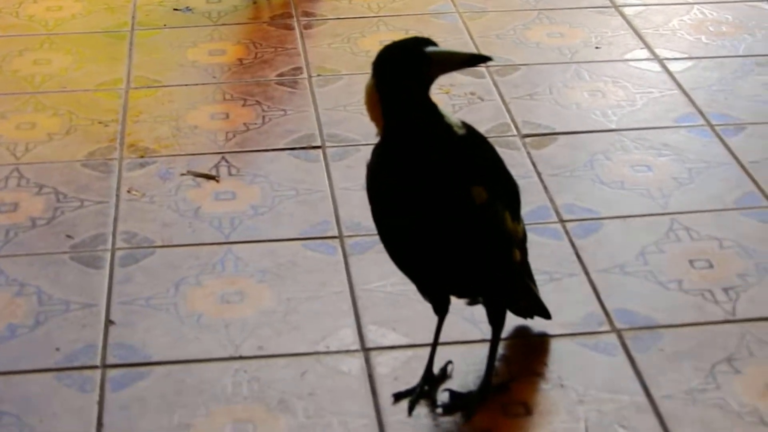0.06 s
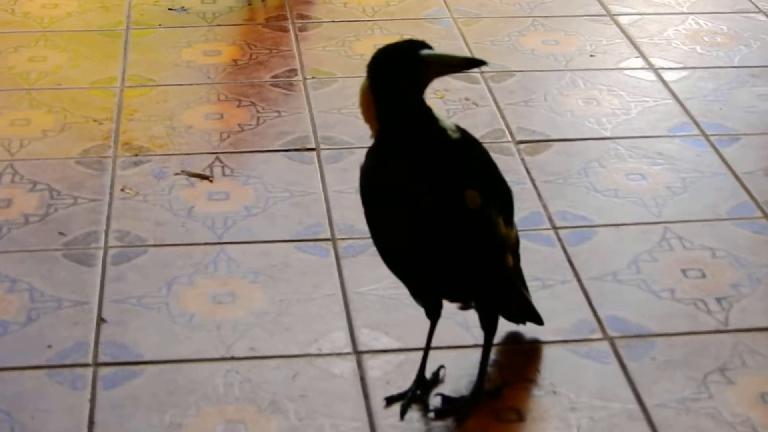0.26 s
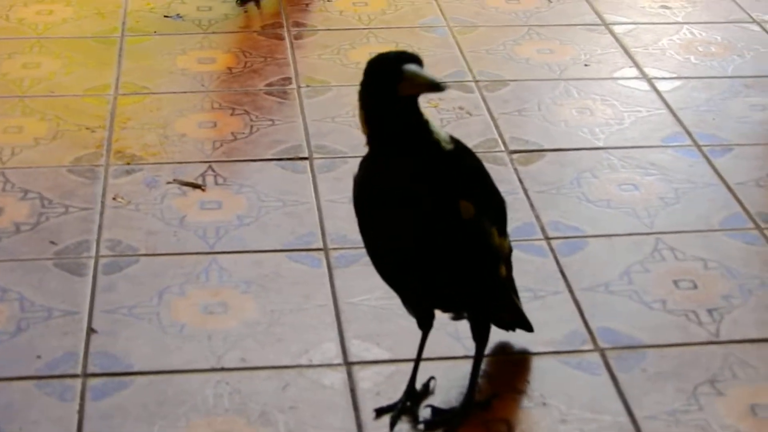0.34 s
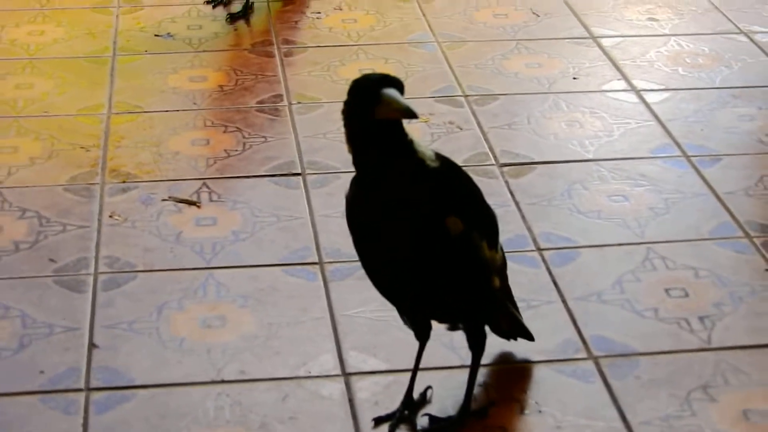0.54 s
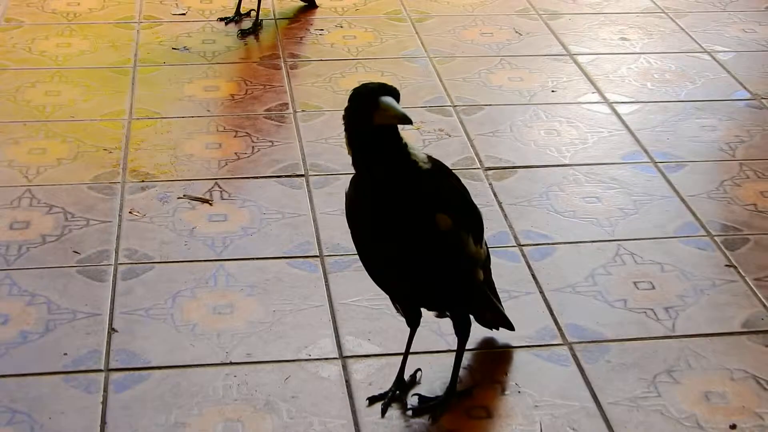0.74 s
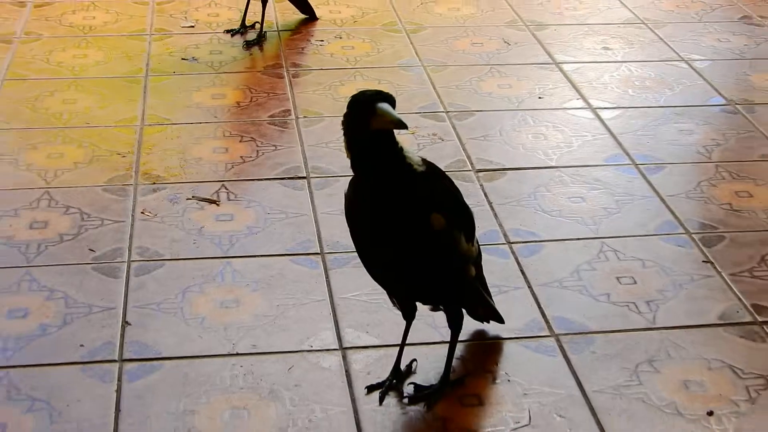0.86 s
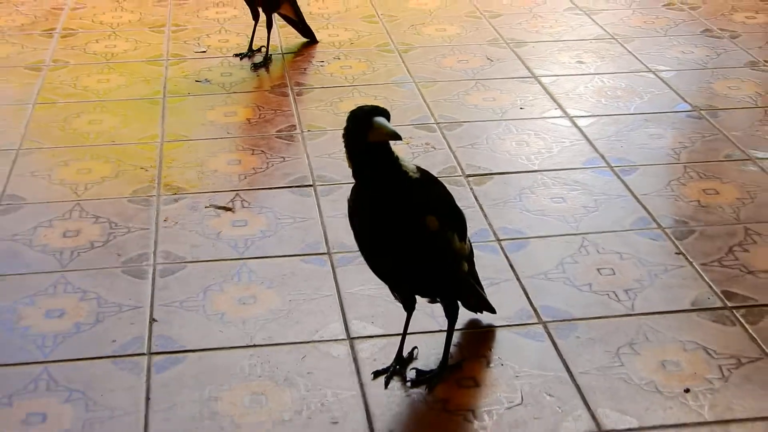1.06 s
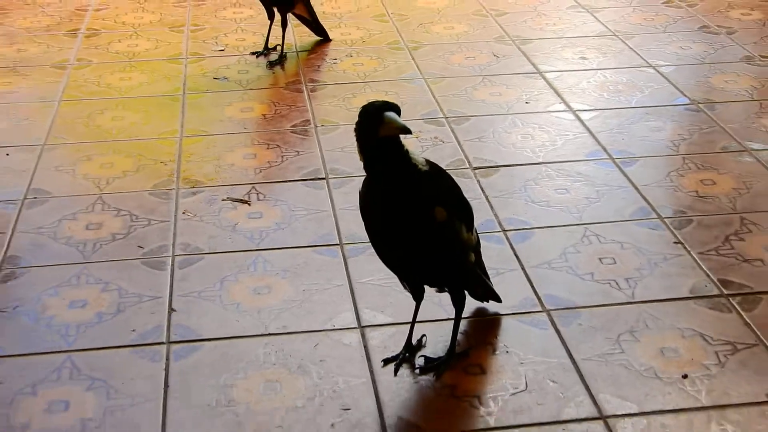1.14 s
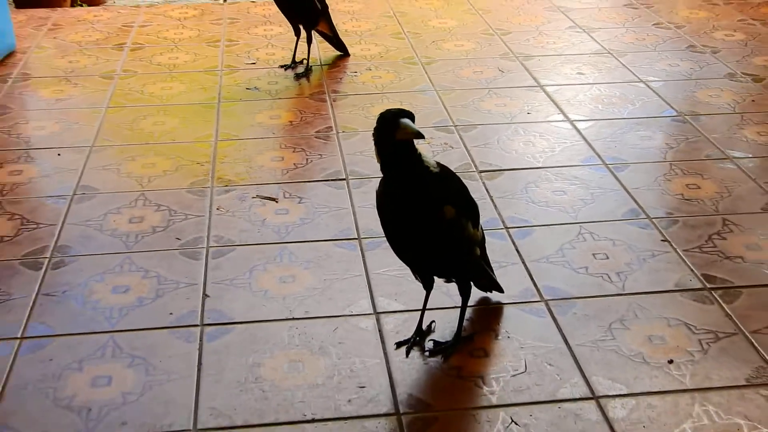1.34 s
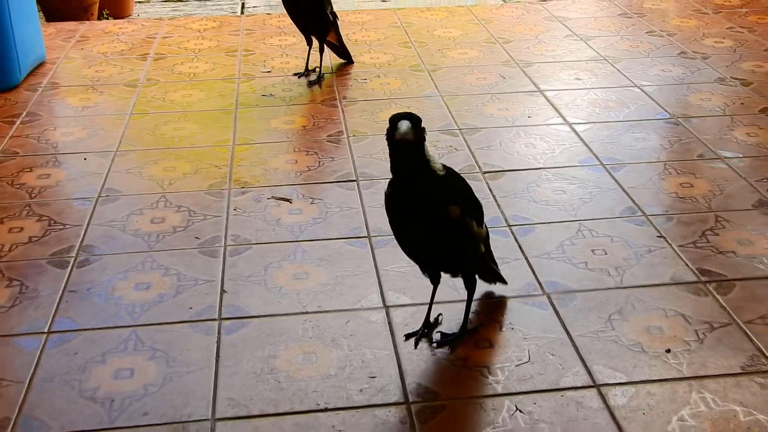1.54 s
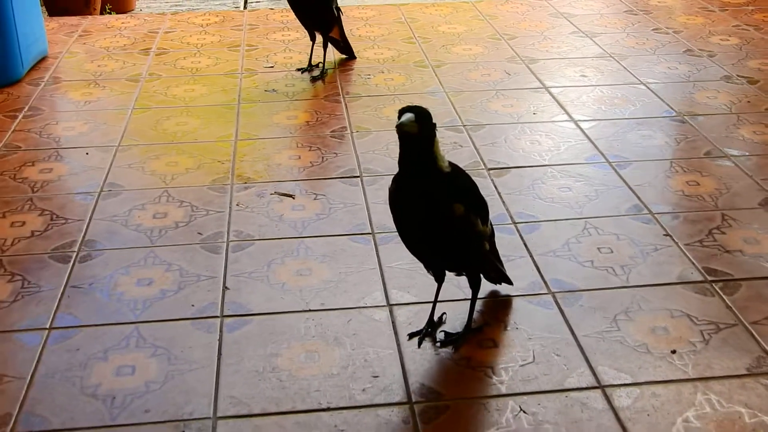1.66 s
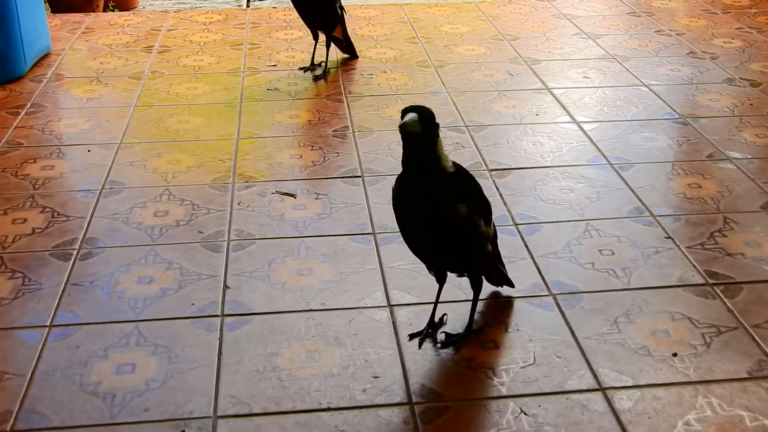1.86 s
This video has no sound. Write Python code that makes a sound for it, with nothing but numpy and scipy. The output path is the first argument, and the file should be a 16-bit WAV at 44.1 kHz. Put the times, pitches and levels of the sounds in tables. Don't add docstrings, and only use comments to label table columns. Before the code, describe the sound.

Single hoarse magpie squawk, close by, over faint distant chirps, handling clicks and soft outdoor rumble

```python
import sys
import numpy as np
from scipy import signal
from scipy.fft import rfft, irfft
from scipy.io import wavfile
from scipy.ndimage import uniform_filter1d, minimum_filter1d

SR = 44100
rng = np.random.default_rng(int(sys.argv[2]) if len(sys.argv) > 2 else 0)


def ratio_of_db(decibels):
    return 10 ** (np.asarray(decibels, float) / 20)


def master_out(mix):
    frames = np.transpose(np.atleast_2d(mix))
    ceiling = np.clip(frames, -1, 1)
    pcm = np.round(ceiling * 32767).astype(np.int16)
    wavfile.write(sys.argv[1], SR, pcm)


N = 83790
T = np.arange(N) / SR


def rms_one(x):
    return x / np.sqrt(np.mean(x ** 2) + 1e-20)


def at_hz(points, hz):
    table_hz, values = np.transpose(points)
    return np.interp(np.log(hz), np.log(table_hz), values)


def bin_hz():
    return np.maximum(np.fft.rfftfreq(N, 1 / SR), 1)


def drift(rate_hz):
    r = np.exp(-2 * np.pi * rate_hz / SR)
    noise = rng.standard_normal(N + 8000)
    return rms_one(signal.lfilter([1], [1, -2 * r, r * r], noise)[8000:])


def ring(clicks, hz, t60_s):
    r, w = ratio_of_db(-60 / (t60_s * SR)), 2 * np.pi * hz / SR
    return signal.lfilter([0, np.sin(w)], [1, -2 * r * np.cos(w), r * r], clicks + 1e-18)


def resonance(x, hz, width_hz):
    r = np.exp(-np.pi * width_hz / SR)
    poles = [1, -2 * r * np.cos(2 * np.pi * hz / SR), r * r]
    return signal.lfilter([(1 - r * r) / 2, 0, (r * r - 1) / 2], poles, x)


def butter(x, order, hz, kind="low"):
    return signal.sosfilt(signal.butter(order, hz, kind, fs=SR, output="sos"), x)


def pan(left_over_right_db):
    return ratio_of_db(np.array([[.5], [-.5]]) * left_over_right_db)


def throat(source, pitch_hz):
    # centre in Hz, width in Hz, level in dB.
    resonances = [(750, 360, -16.5), (1530, 200, 0.5), (1990, 354, 4), (2540, 110, -23), (3524, 298, -5),
                  (4650, 150, -7.5), (5150, 840, -14.5), (5913, 300, -7.5), (6350, 41, -8),
                  (7880, 830, -20), (9760, 740, -10.5), (10200, 1530, -17.5), (12090, 740, -9)]
    closed_hz = 850
    closing = np.clip((pitch_hz.max() - 10 - pitch_hz) / (pitch_hz.max() - closed_hz), 0, 1)
    beak_open, beak_closed = source * (1 - closing), source * closing
    out = ratio_of_db(-10.5) * resonance(beak_closed, closed_hz, 210)
    for k, (hz, width_hz, db) in enumerate(resonances):
        sagged_hz = hz * 0.886 if k in (1, 2) else hz
        both = resonance(beak_open, hz, width_hz) + resonance(beak_closed, sagged_hz, width_hz)
        out += (-1) ** k * ratio_of_db(db) * both
    for hz, width_hz, share in [(3140, 320, 1), (4020, 420, .75)]:
        out = out - share * resonance(out, hz, width_hz)
    faint_top_band = butter(out, 4, [12800, 14500], "band")
    beak_top = signal.cheby2(8, 40, 12100 * 1.03, fs=SR, output="sos")
    return ratio_of_db(-24) * faint_top_band + signal.sosfilt(beak_top, out)


def squawk():
    # time in seconds, pitch in Hz, flutter in Hz, flutter depth in radians, level in dB,
    # brightness in dB per octave, hoarseness 0-1.
    course = [
        (0.185, 882.9, 168.6, 0.63, -63, -19, 0.1),
        (0.198, 905.5, 169.9, 0.65, -30, -43, 0),
        (0.216, 924.3, 167.5, 0.76, -24, -38, 0.06),
        (0.242, 930.2, 166.8, 0.55, -21.5, 0.5, 0.11),
        (0.294, 917.3, 158.7, 0.64, -11.5, 3, 0),
        (.315, 892, 159.2, 0.51, -15.5, 6, 0.21),
        (.332, 858.7, 169.8, 0.19, -19, 5.2, 0.2),
        (.349, 847.2, 172.3, 0.67, -19, 0.5, 0.27),
        (.383, 750, 173, 0.66, -42, 12.5, 0.3),
    ]
    s, *columns = np.transpose(course)
    pitch_hz, flutter_hz, depth_rad, level_db, tilt_db, hoarse = [np.interp(T, s, c) for c in columns]
    jitter_rad = 3.37 * hoarse
    shake = 2 * np.pi * np.cumsum(flutter_hz) / SR + jitter_rad * drift(51)
    phase = 2 * np.pi * np.cumsum(pitch_hz) / SR + depth_rad * np.sin(shake)
    phase = phase + 0.42 * jitter_rad * drift(112)

    voice = np.zeros(N)
    for k in range(1, 14):
        harmonic_db = tilt_db * np.log2(max(k / 4, 1))
        if k == 3:
            harmonic_db = harmonic_db + tilt_db - 5
        voice += ratio_of_db(harmonic_db) * np.cos(k * phase + k * k)
    croak = np.exp(-2 * ((T - s[1] - .008) / 0.033) ** 2)
    voice += ratio_of_db(1) * croak * np.cos(phase - shake / 2 + 1.3 * drift(40))

    white = rng.standard_normal(N)
    white = white - .75 * butter(white, 1, 2600)
    breath = white + ratio_of_db(0.55 * tilt_db) * np.diff(white, prepend=0)
    breath = breath * (1 + 1.3 * np.cos(phase))
    source = voice + 8.5 * ratio_of_db(-7) * np.sqrt(hoarse) * breath

    shimmer_db = 2 * hoarse * drift(130)
    source = source * ratio_of_db(shimmer_db + level_db + 4) * (T > s[0]) * (T < s[-1])
    throb = 1 + 0.24 * np.cos(shake + 1.42)
    catch_db = 4.5 * np.exp(-((T - .348) / 0.0039) ** 2)
    return throat(source * throb * ratio_of_db(catch_db), pitch_hz)


def chirps():
    # start in seconds, length in seconds, level in dB, first Hz, last Hz.
    calls = [(-.03, 0.11, -41.5, 6040, 6350), (0.07, 0.1, -39.5, 6350, 6340),
             (0.094, 0.085, -54.5, 4980, 4870), (0.452, 0.024, -40, 5720, 5690),
             (0.484, 0.051, -49, 5690, 5700), (0.441, 0.035, -45.5, 3830, 3800),
             (0.483, 0.048, -47, 3790, 3800), (0.507, 0.023, -42.5, 5150, 5150),
             (0.538, 0.022, -36, 6000, 6280), (0.575, 0.018, -37, 6120, 6250),
             (0.588, 0.028, -51, 6230, 6200), (0.583, 0.022, -39, 4600, 4630),
             (0.6, 0.014, -37.5, 5150, 5150), (1.27, 0.067, -49.5, 5000, 4950)]
    out = np.zeros(N)
    blur_rad = 0.99 * drift(60)
    wobble_db = 3 * drift(60)
    for s, length_s, db, first_hz, last_hz in calls:
        u = np.clip((T - s) / length_s, 0, 1)
        swell = np.sqrt(np.sin(np.pi * u).clip(0))
        glide = 2 * np.pi * np.cumsum(first_hz + (last_hz - first_hz) * u) / SR
        out += ratio_of_db(db + 0.5) * swell * np.sin(glide + blur_rad * (length_s / 0.041) ** 0.91)
    return out * ratio_of_db(wobble_db)


def knocks():
    # time in seconds, level in dB, colour in Hz, hum level in dB, left over right in dB.
    hits = [(.002, -37, 1120, -23.5, -2), (0.068, -38, 1480, -26.5, -2), (0.128, -44, 1113, -43, -2),
            (0.244, -13.5, 970, -14, -4.5), (0.314, -13.5, 1170, -13.5, -2.5),
            (0.368, -19.5, 1210, -21, -3), (0.597, -29, 1210, -50, 1.5), (0.6196, -23.5, 1730, -29.5, -4.5),
            (0.639, -40, 696, -38, -8), (1.252, -46.5, 1400, -54, 16), (1.264, -22.5, 1275, -23.5, -5.5),
            (1.274, -39.5, 523, -35, -13), (1.567, -37.5, 1020, -36, -2), (1.578, -43, 1680, -38, 0),
            (1.662, -37.5, 380, -54.5, -16.5), (1.71, -45, 1160, -40, -8), (1.722, -40, 825, -41.5, 5),
            (1.777, -38, 1140, -40, 2.5)]
    # mode in Hz, level in dB, t60 in seconds.
    modes = [(363, -4.5, 0.047), (750, -10.5, 0.032), (1095, -7.5, 0.021), (1250, -7, 0.013),
             (1400, -29, 0.12), (1905, -5, 0.0065), (2460, -2.5, 0.0045)]
    size = SR // 2
    t = T[:size]
    out = np.zeros((2, N))
    soft = 0.06 * rms_one(np.exp(-t / 0.00062) * t) / np.sqrt(size)
    hollow = ring(soft, 264.7, 0.27) + ratio_of_db(4.5) * ring(soft, 356, 0.031)
    hollow = np.array([hollow, np.interp(t - 0.00027, t, hollow)])
    for s, db, colour_hz, hum_db, pan_db in hits:
        grit = 0.072 * rng.standard_normal(size) * np.exp(-t / 0.0058) * (t < .03)
        contact = grit + (t == 0)
        for _ in range(2):
            contact = resonance(contact, colour_hz, colour_hz)
        hit = ratio_of_db(hum_db) * hollow
        for hz, mode_db, t60_s in modes:
            off_colour_db = 2.2 * np.log2(hz / colour_hz) ** 2
            hit = hit + ratio_of_db(db + mode_db + 9 - off_colour_db) * ring(contact, hz, t60_s)
        i = int(s * SR)
        out[:, i:i + size] += (pan(pan_db) * hit)[:, :N - i]
    return butter(out, 2, 120, "high")


def pings(rows, soft_cycles):
    out = np.zeros(N)
    for s, db, hz, t60_s in rows:
        t = np.clip(T - s, 0, 1)
        onset = 1 - np.exp(-t * hz / soft_cycles)
        out += ratio_of_db(db - 60 * t / t60_s) * onset * np.sin(2 * np.pi * hz * t)
    return out


def ticks():
    # time in seconds, level in dB, Hz, t60 in seconds.
    snaps = [
        (.6295, -13, 4560, 0.0064),
        (.6295, -36, 10800, 0.0057),
        (.6295, -33, 9000, 0.0056),
        (.6295, -46, 12800, 0.007),
        (.637, -28, 5300, 0.004),
        (.379, -17, 10100, 0.0044),
        (1.264, -38.5, 10200, .006),
        (1.275, -35, 10400, 0.005),
        (1.579, -32, 10000, 0.003),
        (1.685, -23, 4700, 0.0023),
    ]
    return ratio_of_db(5) * pings(snaps, soft_cycles=2.3)


def bumps():
    # time in seconds, level in dB, Hz, t60 in seconds.
    thuds = [
        (.625, -27, 153, 0.035),
        (1.06, -36.5, 54, .15),
        (1.275, -27, 107, 0.064),
        (1.335, -31.5, 60, 0.092),
        (1.594, -25.5, 80, 0.089),
    ]
    return pings(thuds, soft_cycles=0.13)


def rubs():
    # start in seconds, length in seconds, level in dB, centre in Hz, width in Hz.
    strokes = [
        (1.29, 0.15, -48.5, 1090, 1200),
        (1.23, 0.18, -55, 10400, 1600),
        (1.64, 0.083, -47, 1155, 300),
        (1.1, 0.12, -53, 810, 140),
        (1.33, 0.074, -43, 274, 107),
    ]
    grain = rng.standard_normal((2, N)) * ratio_of_db(1.9 * drift(60)) + rng.standard_normal(N)
    out = np.zeros((2, N))
    for s, length_s, db, hz, width_hz in strokes:
        swell = np.sin(np.pi * np.clip((T - s) / length_s, 0, 1))
        rub = resonance(resonance(grain, hz, width_hz), hz, width_hz)
        out += ratio_of_db(db) * swell * rms_one(rub)
    return out


def patio(x):
    t = T[:SR // 2]
    white = rng.standard_normal((2, len(t))) * np.clip(t / 0.01, 0, 1)
    low = butter(white, 1, 3000)
    low_t60_s, treble_t60_s = 0.3, 0.29
    echoes = low * ratio_of_db(-60 * t / low_t60_s) + (white - low) * ratio_of_db(-60 * t / treble_t60_s)
    return signal.fftconvolve(x[None], rms_one(echoes) / np.sqrt(len(t)), axes=1)[:, :N]


def ports(mid, side):
    # Hz, side over mid in dB.
    width_db = [(200, 8), (600, -3.5), (1400, -15.5), (2800, -5.5), (5600, -7.5), (10000, 0), (14000, -1)]
    side = irfft(rfft(side) * ratio_of_db(at_hz(width_db, bin_hz())), N)
    return np.array([mid + side, mid - side])


def coloured(spectrum, patchy_db):
    # Hz, left-right likeness 0-1.
    likeness = [(60, 0.96), (130, 0.97), (270, 0.83), (570, 0.06), (1220, 0.85), (2580, 0.49), (5470, 0.47),
                (11600, 0.031)]
    hz = bin_hz()
    mid, side = rfft(rng.standard_normal((2, N)))
    alike = at_hz(likeness, hz)
    both = np.sqrt(1 + alike) * mid + np.sqrt(1 - alike) * side * [[1], [-1]]
    both = ratio_of_db(at_hz(spectrum, hz)) * both
    place = 2 * np.log2(hz)
    first, last = int(2 * np.log2(spectrum[0][0])), int(2 * np.log2(spectrum[-1][0])) + 1
    out = np.zeros((2, N))
    for k in range(first, last + 1):
        band = irfft(both * np.clip(1 - abs(place - k), 0, 1), N)
        out += ratio_of_db(patchy_db * drift(5.9)) * band
    return rms_one(out)


def background():
    # Hz, density in dB per Hz.
    rumble = [(15, -51), (25, -85), (54, 1), (160, -4), (432, -22), (472, -25.5), (509, -18.5), (630, -36),
              (786, -20.5), (900, -27.5), (1170, -24), (1980, -120)]
    hiss = [(700, -5.5), (950, -7.5), (1170, 0.5), (1500, -6), (2300, -1), (3300, -7), (4600, 2),
            (5800, -2.5)]
    insects = [(5800, 3), (6600, 10.5), (8000, 11.5), (8800, -38), (10500, 0.5), (12000, -13), (13500, -17),
               (15700, -36)]
    # time in seconds, swell in dB.
    outdoors = [(0, 2), (.2, 0.5), (.62, 5.5), (.7, 2.5), (1.9, -0.05)]
    air = ratio_of_db(-48) * coloured(hiss, patchy_db=.7) + ratio_of_db(-49) * coloured(insects, patchy_db=.4)
    swell_db = np.interp(T, *np.transpose(outdoors))
    return ratio_of_db(swell_db) * air + ratio_of_db(-43.5) * coloured(rumble, patchy_db=3.5)


def scene():
    bird, far = squawk(), chirps()
    casing = knocks() + ticks()
    wet = ratio_of_db(-8.5) * patio(bird + ratio_of_db(8) * far + ratio_of_db(-27.5) * casing.mean(axis=0))
    bounce = np.roll(bird, int(.0013 * SR)) - np.roll(bird, int(.0031 * SR))
    near = ports(bird + wet[0], 0.55 * bounce + 1.15 * wet[1])
    return near + pan(1.2) * far + casing + rubs() + bumps() + background()


def roll_off(x):
    return signal.sosfilt(signal.butter(12, 15800, fs=SR, output="sos"), x)


def record(dry):
    gain = np.minimum(1, .92 / (abs(dry).max(axis=0) + 1e-9))
    gain = uniform_filter1d(minimum_filter1d(gain, size=400), size=200)
    return roll_off(dry * gain)


dry = scene()
out = record(dry)
master_out(out)
```